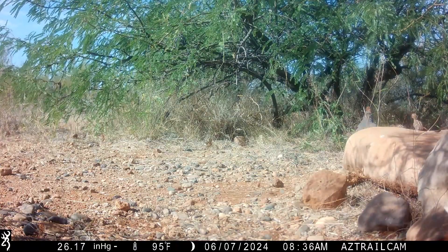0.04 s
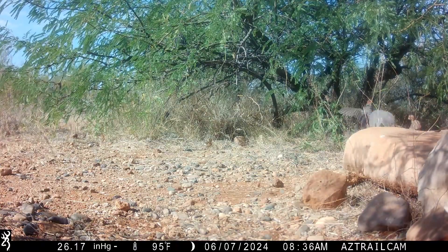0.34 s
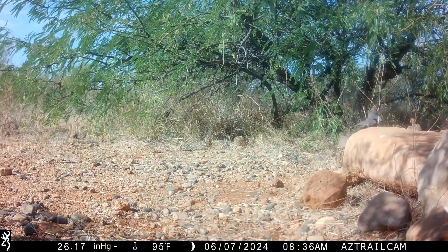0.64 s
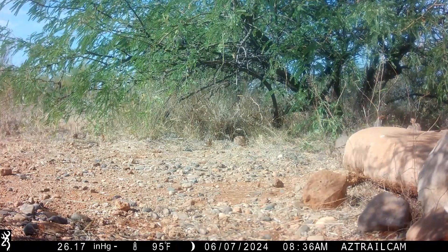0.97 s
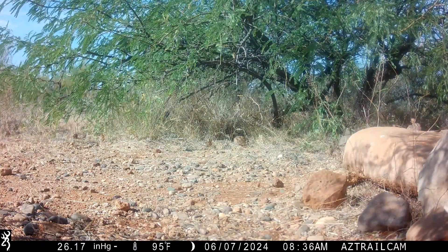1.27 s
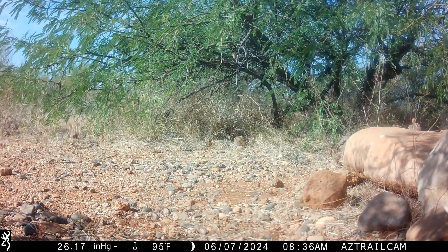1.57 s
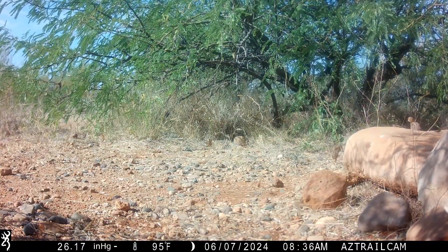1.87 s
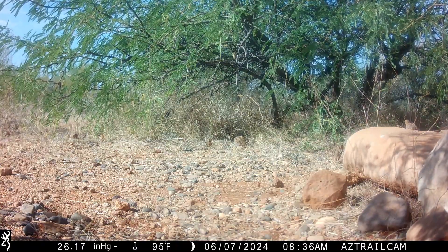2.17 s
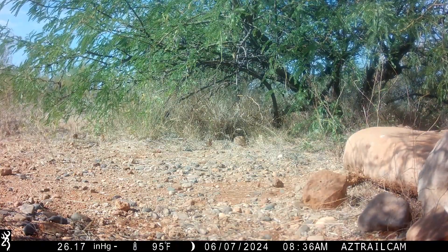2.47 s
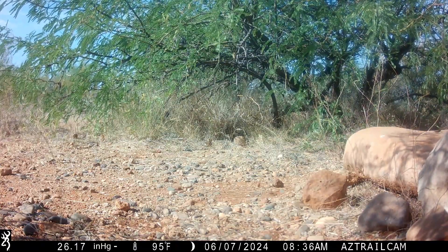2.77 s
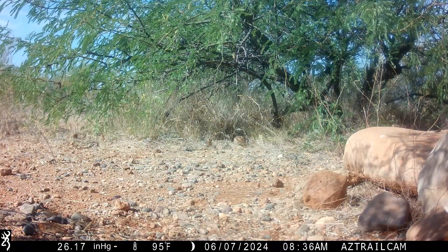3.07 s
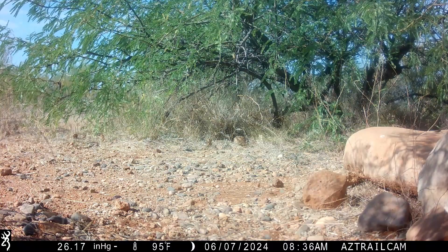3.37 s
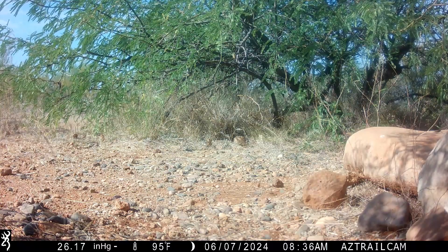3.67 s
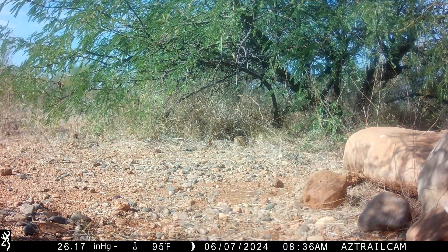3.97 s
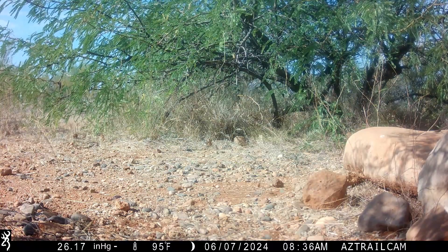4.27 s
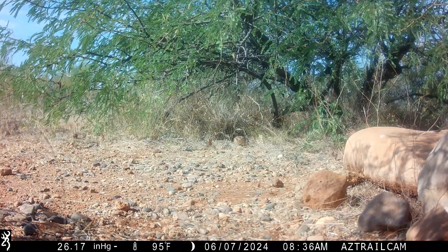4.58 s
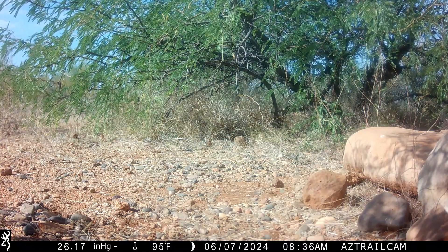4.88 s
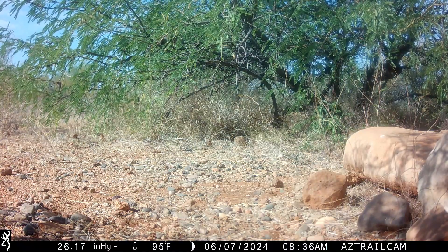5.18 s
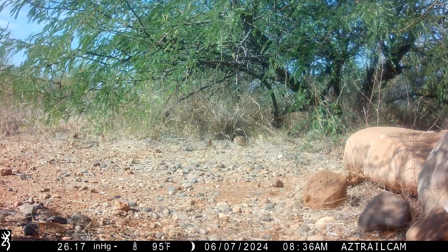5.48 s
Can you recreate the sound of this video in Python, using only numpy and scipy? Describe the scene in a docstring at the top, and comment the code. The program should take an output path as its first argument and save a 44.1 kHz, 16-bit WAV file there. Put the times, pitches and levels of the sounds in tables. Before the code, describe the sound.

Soft clucks from a group of quail and a short flutter of wings come first, over faint, still outdoor air. A few small puffs of air bump the microphone. Then one close quail takes over with sharp chips and quick swoops, while the others keep clucking and gravel ticks now and then. It finishes with two long, rough calls, the first held level, the second leaping up and sinking.

```python
"""Soft quail clucks over faint desert air, then a brief flutter of wings as one bird comes down.
Feet and beaks tick on gravel, a tiny bird pips far off, air puffs at the microphone, a camera whines.
A near quail gives sharp chips and swoops, then two long bending calls. Each quail voice is a source
and a filter: harmonics of the syrinx shaped by throat and beak. Rocks and brush return short echoes."""
import sys
import numpy as np
from scipy import signal
from scipy.fft import rfft, irfft, next_fast_len
from scipy.io import wavfile
from scipy.ndimage import map_coordinates

SR = 44100
rng = np.random.default_rng(int(sys.argv[2]) if len(sys.argv) > 2 else 0)


def inscribe(sig):
    """Save sig as 16-bit PCM at rate SR to the path in sys.argv[1].

    A 1-D sig is mono; a 2-D sig holds one channel per row.
    Samples are clipped to [-1, 1] before scaling.
    """
    pcm = np.round(np.clip(np.atleast_2d(sig).T, -1, 1) * 32767)
    wavfile.write(sys.argv[1], SR, pcm.astype(np.int16))


N = 248724
BAND_LIMIT_HZ = 15720


def amp(db):
    """Amplitude ratio: tenfold for every 20 dB."""
    return 10 ** (np.asarray(db) / 20)


def along(points, hz):
    """Interpolation of (f/Hz, value) points on a logarithmic frequency axis."""
    f, value = np.transpose(points)
    return np.interp(np.log(hz + 1), np.log(f + 1), value)


def clock():
    """Uniform sampling: t/s of every sample."""
    return np.arange(N) / SR


def wobble(rate, size):
    """Smooth random modulation: a spline through `rate` Gaussian knots a second."""
    knots = rng.standard_normal(int(size * rate / SR) + 4)
    return map_coordinates(knots, [np.arange(size) * rate / SR])


def filtered(x, response):
    """Linear filtering: the spectrum is multiplied by a frequency response."""
    size = next_fast_len(N + SR // 2)
    return irfft(rfft(x, size) * response(np.fft.rfftfreq(size, 1 / SR)), size)[:N]


def noise(spectrum):
    """Spectral shaping: white noise is coloured, then scaled to rms 1."""
    x = filtered(rng.standard_normal(N), lambda hz: amp(along(spectrum, hz)))
    return x / np.sqrt(np.mean(x ** 2) + 1e-20)


def swishes(swells, spectrum):
    """Amplitude modulation: coloured noise under a sum of Lorentzian swells."""
    t = clock()
    return noise(spectrum) * sum(amp(db) / (1 + ((t - s) / half) ** 2) for s, db, half in swells)


def air(waver_db=1.5):
    """Broadband ambient noise: still desert air, wavering slightly in level."""
    # colour of the air: f/Hz, relative density/dB
    spectrum = [(25, -13.5), (110, -16), (220, -11), (430, -3.5), (1000, -1.5), (2200, -4), (3500, -14.5),
                (4500, -23), (5500, -29.5), (6700, -35.5), (7900, -32), (10000, -34.5), (15500, -36.5)]
    # its slow drift: t/s, level/dB
    drift = [(.2, -67), (.7, -65.5), (1.599, -66.5), (3.999, -67.6), (4.95, -66.5)]
    return noise(spectrum) * amp(np.interp(clock(), *np.transpose(drift)) + waver_db * wobble(6.7, N))


def camera_whine(steady_hz=7830, steady_db=-101, pulse_start_s=4.06, pulse_hz=30):
    """Modulated tones: a faint electronic whine, later joined by a pulsing cluster."""
    # pulsing tones: f/Hz, level/dB
    cluster = [(4040, -76.5), (4410, -74.5), (4790, -80), (5200, -89.5), (5650, -86.5), (6050, -89),
               (6450, -94)]
    t = clock()
    tone = lambda hz, waver_hz: np.sin(2 * np.pi * np.cumsum(hz + waver_hz * wobble(200, N)) / SR)
    fade_in = np.clip((t - pulse_start_s) / 0.43, 0, 1)
    pulses = ((1 + np.sin(2 * np.pi * pulse_hz * t)) / 2) ** 2
    steady = amp(steady_db) * tone(steady_hz, 70)
    return steady + fade_in * pulses * sum(amp(db) * tone(hz, 12) for hz, db in cluster)


def air_puffs():
    """Pressure fluctuations: puffs of air on the microphone make low thumps."""
    # puffs: t/s, level/dB, half length/s
    puffs = [(.54, -72.5, 0.051), (.775, -65.5, 0.013), (.857, -64.5, 0.0074), (.9, -70.5, 0.009),
             (1.064, -54.5, .007), (1.3, -71, 0.025), (1.355, -63.5, 0.0069), (1.447, -72, 0.0093),
             (2.506, -60, 0.0075)]
    # their colour: f/Hz, relative density/dB
    spectrum = [(20, -4), (80, -0.5), (170, -10), (280, -26.5), (2000, -120)]
    return swishes(puffs, spectrum)


def brush_echo(x, delay_s=0.006):
    """Diffuse scattering: rocks and brush return a short, bright, exponentially decaying tail."""
    # reverberation time: f/Hz, T60/s
    decay = [(500, 0.067), (3500, 0.094), (10000, 0.097)]
    # colour of the scattered sound: f/Hz, gain/dB
    colour = [(300, -17.5), (2000, -4), (3900, 7), (6500, -3)]
    hz, t, bands = signal.stft(rng.standard_normal(SR // 3), SR, nperseg=256)
    tail = signal.istft(bands * amp(-60 * t / along(decay, hz)[:, None]), SR, nperseg=256)[1]
    tail = np.pad(tail / np.linalg.norm(tail), (int(delay_s * SR), 0))
    return filtered(signal.fftconvolve(x, tail)[:N], lambda hz: amp(along(colour, hz)))


def boulder_echo(x, delay_s=0.011, spread_s=0.002):
    """Early reflection: boulders beside the birds throw back a quick, smeared copy."""
    t = np.arange(SR // 30) / SR
    response = rng.standard_normal(len(t)) * np.exp(-((t - delay_s) / spread_s) ** 2)
    return signal.fftconvolve(x, response / np.linalg.norm(response))[:N]


def far_bird(half_s=0.012, sweep_per_s=2.4, waver=0.025):
    """Frequency sweeps under Gaussian envelopes: the thin rising pips of a tiny far bird."""
    # pips: t/s, level/dB, f/Hz
    pips = [(1.445, -84, 6600), (1.92, -83, 6000), (2.335, -78, 6600), (2.77, -82, 6000),
            (3.102, -80, 5800), (3.775, -73.5, 6000), (4.29, -78, 6200)]
    out, t = np.zeros(N), np.arange(-SR // 20, SR // 20) / SR
    envelope = np.exp(-(t / half_s) ** 2)
    for s, db, hz in pips:
        pitch = hz * (1 + sweep_per_s * t + waver * wobble(400, len(t)))
        phase = 2 * np.pi * np.cumsum(pitch) / SR
        out[round(s * SR) - len(t) // 2:][:len(t)] += amp(db) * envelope * np.sin(phase)
    return out


def gravel(ring_t60_s=0.032, pitch_spread=0.14, crack_gain=0.12, crack_t60_s=0.018):
    """Impact excitation: each touch of foot or beak rings five stones, with a small crack."""
    # touches: t/s, level/dB, centre f/Hz
    touches = [(.625, -47, 2880), (2.146, -55, 2330), (2.287, -40.5, 2400), (2.779, -44, 1680),
               (3.214, -46, 2800), (3.421, -49, 2250), (3.788, -54, 2250), (3.852, -51, 2310),
               (4.043, -46, 2400), (4.278, -46, 2520), (4.895, -44.5, 1370), (4.901, -43, 1890),
               (5.074, -49.5, 1970)]
    # colour of the crack: f/Hz, relative density/dB
    spectrum = [(300, -11.5), (1500, 4.5), (3000, 1), (5000, -11.5), (10000, -26.5)]
    out, t, grit = np.zeros(N + SR), np.arange(SR // 10) / SR, noise(spectrum)
    attack = np.tanh(t / 0.00065) ** 2
    for s, db, hz in touches:
        start = round(s * SR)
        stone_hz = hz * np.exp(pitch_spread * rng.standard_normal((5, 1)))
        modes = np.sin(2 * np.pi * (stone_hz * t + rng.random((5, 1))))
        ring = np.mean(modes, axis=0) * amp(-60 * t / ring_t60_s)
        crack = crack_gain * np.roll(grit, -start)[:len(t)] * amp(-60 * t / crack_t60_s)
        out[start:][:len(t)] += amp(db) * (ring + crack) * attack
    return out[:N]


def scratches():
    """Friction noise: feet scrape through dry grit."""
    # scrapes: t/s, level/dB, half length/s
    scrapes = [(.63, -75, 0.0065), (.865, -67.5, 0.0069), (2.385, -67, 0.0046)]
    # colour of the grit: f/Hz, relative density/dB
    spectrum = [(600, -19), (1500, -1), (3000, 1), (4500, -6), (7000, -13.5), (10000, -21), (15000, -25.5)]
    return swishes(scrapes, spectrum)


def wings():
    """Aerodynamic noise: feathers push the air as a bird flaps down from a rock."""
    # wing strokes: t/s, level/dB, half length/s
    strokes = [(.469, -61.5, 0.0048), (.502, -55, 0.0016), (.512, -50, 0.0032), (.55, -63.5, 0.11),
               (.557, -60, 0.0017), (.566, -47.5, 0.0035)]
    # colour of the feathers: f/Hz, relative density/dB
    spectrum = [(100, -28), (270, -12), (600, 3), (900, -0.5), (1700, -11.5), (3000, -12.5), (5000, -28.5),
                (8000, -38.5), (14000, -47.5)]
    return swishes(strokes, spectrum)


def vocal_tract(phase, pitch, db, throat_db, beak_hz, throat_hz=1550, throat_oct=0.46, beak_q=3):
    """Source-filter model: 14 harmonics of the syrinx pass the resonances of throat and beak."""
    # fixed colour of a quail's voice: f/Hz, gain/dB
    colour = [(300.0, -3.0), (450.0, 3.0), (750.0, -2.0), (1500.0, -4.0), (2250.0, -10.0), (3000.0, -11.0),
              (3700.0, -14.0), (4500.0, -24.0), (5500.0, -29.0), (7300.0, -34.0), (8400.0, -30.0),
              (10000.0, -38.0), (14000.0, -39.0)]
    harmonic = np.arange(1, 15)[:, None]
    hz = harmonic * pitch
    detuning = np.log2(hz / throat_hz) / throat_oct
    throat = throat_db * np.exp(-detuning ** 2)
    lag = 0.96 * np.tanh(detuning)  # the throat delays what lies above its resonance
    beak = 1 / (1 - (hz / beak_hz) ** 2 + 1j * hz / beak_hz / beak_q)
    gain = amp(db + along(colour, hz) + throat) * (hz < BAND_LIMIT_HZ)
    return -np.sum(gain * np.real(beak * np.exp(1j * (harmonic * phase - lag))), axis=0)


def call(gesture, turbulence, jitter, break_hz, break_jitter, flutter, flutter_hz=150, shimmer=0.013):
    """Irregular oscillation: the syrinx follows a gesture unsteadily. Returns sample indices and sound."""
    # a gesture: t/s, f/Hz, source level/dB, throat gain/dB, beak resonance/Hz
    s, *columns = np.transpose(gesture)
    at = np.arange(int(max(s[0], 0) * SR), min(int((s[-1] + 0.0027) * SR), N))
    t, size = at / SR, len(at)
    pitch, db, throat_db, beak_hz = (np.interp(t, s, column) for column in columns)
    strain = np.clip((pitch - break_hz) / 60, 0, 1)  # pressed high, the voice turns harsh
    unsteady = jitter * wobble(700, size) + break_jitter * strain * wobble(1400, size)
    # in the whistling upper register the membranes flutter
    tremble = flutter * np.clip((pitch - 1200) / 200, 0, 1) * np.sin(2 * np.pi * flutter_hz * t)
    phase = 2 * np.pi * np.cumsum(pitch * (1 + unsteady + 0.068 * tremble)) / SR
    voice = vocal_tract(phase, pitch, db, throat_db, beak_hz)
    # a wide open beak lets out the rasp of the air, most of all under strain
    rasp = amp(db) * (strain + 0.064) * (beak_hz / 4000) ** 3 * turbulence[at]
    fade = np.clip(np.minimum((t - t[0]) / 0.0058, (t[-1] - t) / 0.0034), 0, 1)
    return at, fade * (voice * (1 + tremble + shimmer * wobble(500, size)) + rasp)


def quail(calls, **voice):
    """Superposition: one voice sings its calls, each a gesture and a rasp gain/dB."""
    # turbulent air in a strained voice: f/Hz, relative density/dB
    spectrum = [(1000, -29.5), (2300, -3), (3300, 1.5), (4200, -0.5), (5200, -11.5), (6500, -18.5),
                (9000, -34.5), (14000, -42.5)]
    out, turbulence = np.zeros(N), noise(spectrum)
    for gesture, rasp_db in calls:
        at, sound = call(gesture, amp(rasp_db) * turbulence, **voice)
        out[at] += sound
    return out


def soft_edge(inside_s, ramp_s=0.017, depth_db=9.5):
    """Attack and release: gain/dB of a soft note this far inside its start or end."""
    return -depth_db * np.clip(1 - inside_s / ramp_s, 0, 1)


def cluck(s, rise_s, first_hz, top_hz, rise_db, drop_db, drop_s=0.022, swell_db=6, fade_db=10.5):
    """Pitch glide: a thin note swells, then drops quickly; the higher its top, the wider the beak."""
    t = s + np.array([-rise_s, -rise_s / 2, 0, drop_s / 2, drop_s])
    pitch = [first_hz, (first_hz + top_hz) / 2, top_hz, min(780.5, top_hz), 536]
    level = [rise_db - 2 * swell_db, rise_db - swell_db / 2, rise_db, drop_db, drop_db - fade_db]
    throat_db, beak_hz = -5.5, 1.55 * top_hz
    return np.transpose(np.broadcast_arrays(t, pitch, level, throat_db, beak_hz))


def coo(s, length_s, hz, glide_oct, db, throat_db, sag_db=4.5, beak_hz=1357):
    """Low-pass filtering: a closed beak muffles a note that arches in pitch and level."""
    u = np.linspace(-1, 1, 20)
    arch_oct = 0.265 * min(0.08 / length_s, 1) ** 2  # longer coos arch less
    pitch = hz * 2 ** (glide_oct * u / 2 - arch_oct * u ** 2)
    level = db - sag_db * u ** 2 + soft_edge((1 - abs(u)) * length_s / 2)
    return np.transpose(np.broadcast_arrays(s + length_s * (u + 1) / 2, pitch, level, throat_db, beak_hz))


def covey(rasp_db=-32):
    """Soft phonation: the covey clucks, coos and gives two high, fluttering notes."""
    # clucks: turn t/s, rise/s, first f/Hz, turn f/Hz, rise level/dB, drop level/dB
    clucks = [(.18, 0.11, 780, 1165, -64, -56.5), (.714, .012, 1006, 1067, -70, -58.5),
              (.82, 0.046, 1108, 1161, -59, -61), (.998, .095, 930, 1363, -61, -56),
              (1.05, 0.0062, 1077, 1150, -74, -57.5), (1.175, 0.049, 588, 663, -61.5, -58.5),
              (1.806, 0.1, 560, 1030, -58.5, -55), (1.893, 0.052, 1199, 1300, -55.5, -50.5),
              (2.036, .03, 777, 1132, -58.5, -54), (2.116, .01, 1226, 1216, -56, -52),
              (3.217, 0.048, 470, 682, -57, -59), (3.82, 0.059, 506, 1020, -55, -52)]
    # coos: t/s, length/s, f/Hz, glide/octaves, level/dB, throat gain/dB
    coos = [(.34, .16, 520, 0.21, -65, -40), (1.495, 0.069, 634, -0.094, -59.5, -3),
            (1.788, 0.055, 647, -0.19, -59, -8), (2.052, .145, 920, -.08, -70, -5),
            (2.343, 0.064, 652, 0.064, -56, -4), (2.741, 0.11, 673, -0.094, -58.5, -7.5),
            (4.106, 0.057, 575, -0.327, -53, -8), (4.315, 0.057, 494, -0.12, -58.5, 5.5),
            (4.967, 0.085, 610, 0.45, -67.5, -24)]
    # a short high note: t/s, f/Hz, level/dB, throat gain/dB, beak resonance/Hz
    squeak = [(1.222, 1400, -61, -1, 2290), (1.232, 1590, -45, -4.5, 1700), (1.245, 1937, -47.5, 0, 1760),
              (1.256, 1590, -63, 3, 2520), (1.263, 2160, -50.5, 13, 2040), (1.274, 2000, -78, -5, 2480)]
    # a longer note that leaps up and falls back: columns as for the squeak
    squeal = [(3.416, 760, -64, -25, 2290), (3.431, 759, -52, -2, 1310), (3.46, 873, -46.5, 0.5, 2150),
              (3.473, 1372, -48, -.5, 2640), (3.504, 1454, -45, -6.5, 2700), (3.53, 1484, -45, -2, 3230),
              (3.539, 900, -46, -11, 2130), (3.545, 610, -49, 6, 2050), (3.554, 520, -77, -18, 1490)]
    gestures = [cluck(*row) for row in clucks] + [coo(*row) for row in coos] + [squeak, squeal]
    calls = [(gesture, rasp_db) for gesture in gestures]
    return quail(calls, jitter=0.014, break_hz=900, break_jitter=0.0072, flutter=0.31)


def chip(s, db, hz, throat_db, beak_hz, tail_s, rasp_db, grunt_s, grunt_hz, grunt_db, grunt_throat_db):
    """Register break: a low grunt creeps upward, then the voice leaps as the beak snaps open."""
    # shoulder and leap: t/s from the accent, pitch ratio, level/dB, throat gain/dB, beak resonance ratio
    leap = [(-.023, .62, -14.5, -5, 0.46), (-.014, .815, -1, -3.5, 0.87), (-.008, .83, -0.5, -2, 1),
            (0, 1, 1, -0.5, 1)]
    # dying away: share of the tail, then the same columns
    tail = [(.32, .92, -2.5, 6.5, 1.13), (.68, 1.4, -8.5, -3.5, 0.92), (1, 1.06, -35, -5, 1.09)]
    lead_s, rise_oct_per_s, swell_db_per_s, throat_db_per_s, grunt_beak_hz = 0.032, 4.4, 100, 66.5, 1950
    u = np.linspace(-grunt_s, 0, 20)
    grunt = np.broadcast_arrays(s - lead_s + u, grunt_hz * 2 ** (rise_oct_per_s * u),
                                grunt_db + swell_db_per_s * u + soft_edge(u + grunt_s),
                                grunt_throat_db + throat_db_per_s * u, grunt_beak_hz)
    t, ratio, level, throat, beak = np.transpose(leap + [(share * tail_s, *rest) for share, *rest in tail])
    pitch = ratio * hz
    shoulder = slice(1, 3)
    pitch[shoulder] += 0.62 * (755 - pitch[shoulder].mean())  # near 755 Hz, however high the leap
    accent = [s + t, pitch, db + level, throat_db + throat, beak_hz * beak]
    return np.hstack([grunt, accent]).T, rasp_db


def swoop(s, db, climb_s, fall_s, flick_hz, last_hz, top_hz=769, low_hz=437, climb_oct_per_s=8.8):
    """Pitch-level coupling: a note climbs, flicks and falls, louder when higher; the beak opens on top."""
    drop_s, flick_s, climb_db_per_oct, fall_db_per_oct = 0.016, 0.005, 38, 15.5
    shut_hz, open_hz, opens_s, shuts_s = 1296, 3180, 0.019, 0.068
    t = np.linspace(-climb_s, fall_s, 100)
    climb = np.maximum(top_hz * 2 ** (climb_oct_per_s * t), low_hz)
    fall = last_hz + (top_hz - last_hz) / (1 + (t / drop_s) ** 2) ** 2
    pitch = np.where(t < 0, climb, fall)
    flick = flick_hz * np.exp(-(t / flick_s) ** 2)
    level = db + np.where(t < 0, climb_db_per_oct, fall_db_per_oct) * np.log2(pitch / top_hz)
    level += soft_edge(np.minimum(t + climb_s, fall_s - t))
    throat_db = 3 + 8.5 * np.clip(t / drop_s, 0, 1)
    opening = np.exp(-(t / np.where(t < 0, opens_s, shuts_s)) ** 2)
    return np.transpose([s + t, pitch + flick, level, throat_db, shut_hz + (open_hz - shut_hz) * opening])


def near_quail(swoop_rasp_db=-33, held_rasp_db=-12, falling_rasp_db=-6):
    """Pressed phonation: the near bird's chips, swoops and two long calls roughen at high pitch."""
    # chips: accent t/s, level/dB, f/Hz, throat gain/dB, beak resonance/Hz, tail/s, rasp gain/dB,
    # then the leading grunt: length/s, final f/Hz, final level/dB, final throat gain/dB
    chips = [(2.251, -40, 1021, 4, 3640, 0.012, -23, .042, 390, -64.5, -27),
             (2.523, -37, 966, 2, 3100, 0.013, -26, 0.089, 486.5, -59.5, -1),
             (2.734, -37.5, 1002, 5, 3580, 0.012, -20, .058, 425.7, -58, 1),
             (3.055, -36, 924, 7, 3760, 0.023, -14, .02, 439, -57, 11),
             (3.293, -35.5, 914, 5, 3660, 0.017, -12.5, .038, 435.3, -58, 9.5),
             (3.657, -36.5, 934, 7.5, 3850, 0.016, -14, .044, 414, -59.5, 7.5),
             (4.122, -36, 899, 5.5, 3750, 0.024, -18.5, 0.036, 433, -57, 8.5)]
    # swoops: top t/s, level/dB, climb/s, fall/s, flick/Hz, f/Hz approached in the fall
    swoops = [(2.987, -38, 0.14, 0.028, -1.5, 407.4), (3.937, -36.5, 0.15, 0.024, 169.5, 391),
              (4.456, -38.8, .086, 0.03, 180.5, 521)]
    # a long call that holds its pitch: t/s, f/Hz, level/dB, throat gain/dB, beak resonance/Hz
    held = [(4.478, 558, -55, 17, 3450), (4.51, 658, -44.5, -1.5, 3200), (4.542, 728.6, -38, 0.5, 3470),
            (4.585, 724.8, -38, 3.5, 3950), (4.635, 733, -35.5, -2.5, 2870),
            (4.655, 754.7, -38.5, 0.5, 2450), (4.745, 733.5, -41, -4, 2370), (4.763, 659, -46.5, 1, 2120),
            (4.78, 510, -71, 5, 2400)]
    # a long call that leaps, then sinks: the same columns
    falling = [(5.248, 300.6, -68, -27, 2240), (5.27, 453, -61, 11.5, 1440), (5.285, 631, -41.5, 1, 2630),
               (5.308, 811, -37.5, 5, 3180), (5.326, 863, -36.5, 9.5, 4300), (5.339, 897, -38.5, 4.5, 4360),
               (5.354, 770, -37, 9, 4100), (5.385, 743, -32, -0.5, 4000), (5.424, 744, -37.5, 1, 2640),
               (5.446, 724.6, -39, -4.5, 2450), (5.485, 700.3, -40, -3, 2380),
               (5.525, 707, -40, -3.5, 2500), (5.56, 690.5, -41, -2, 2500), (5.639, 672, -43, -2, 2460)]
    calls = [chip(*row) for row in chips] + [(swoop(*row), swoop_rasp_db) for row in swoops]
    calls += [(held, held_rasp_db), (falling, falling_rasp_db)]
    return quail(calls, jitter=0.0035, break_hz=784, break_jitter=0.017, flutter=0.1)


def scene():
    """Superposition: direct sound and its reflections add over the quiet background."""
    near, flock = near_quail(), covey()
    small_sounds = wings() + scratches() + gravel() + far_bird()
    scattered = brush_echo(amp(-18.5) * near + amp(-21.5) * (flock + small_sounds))
    reflected = amp(-18.5) * boulder_echo(near + flock)
    background = air_puffs() + air() + camera_whine()
    return (background + scattered + reflected + small_sounds + flock + near)[None]


def record(dry):
    """Ideal low-pass filter: the camera keeps nothing above its band limit."""
    return filtered(dry[0], lambda hz: hz < BAND_LIMIT_HZ)[None]


dry = scene()
out = record(dry)
inscribe(out)
```